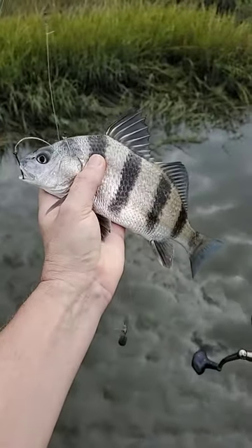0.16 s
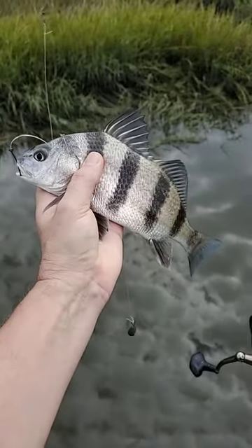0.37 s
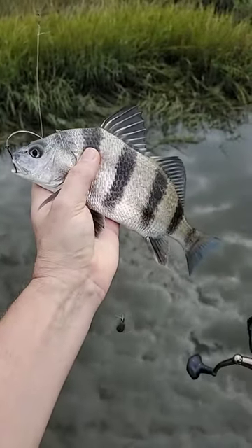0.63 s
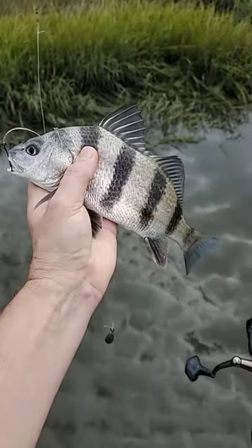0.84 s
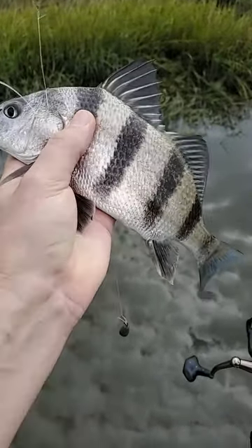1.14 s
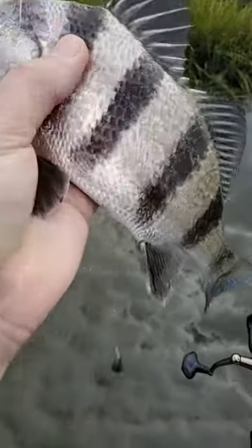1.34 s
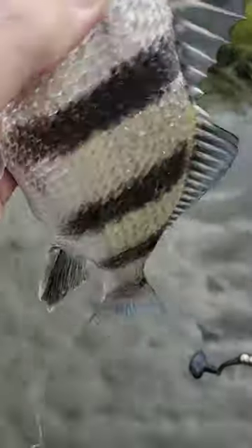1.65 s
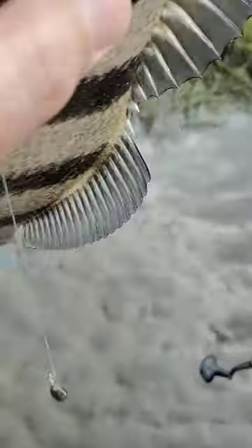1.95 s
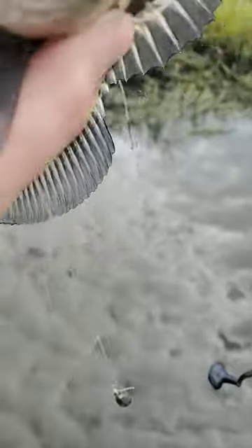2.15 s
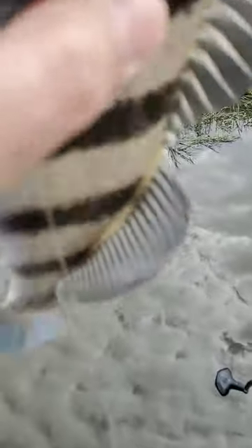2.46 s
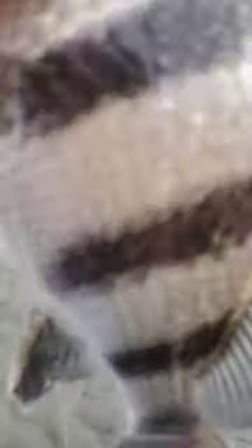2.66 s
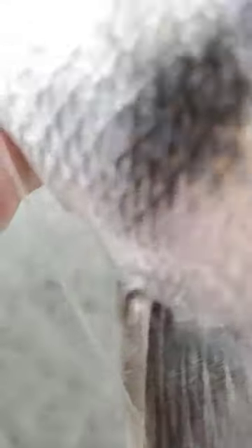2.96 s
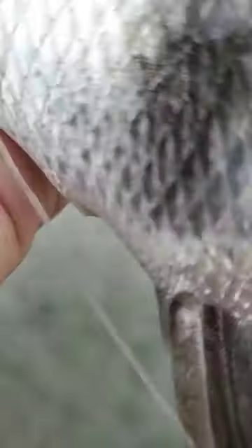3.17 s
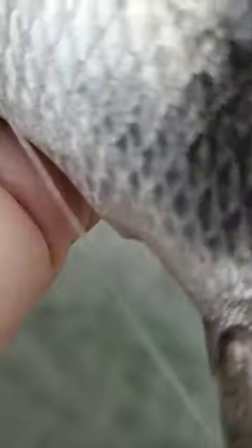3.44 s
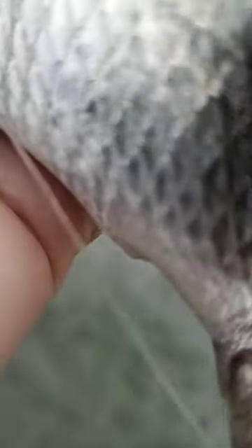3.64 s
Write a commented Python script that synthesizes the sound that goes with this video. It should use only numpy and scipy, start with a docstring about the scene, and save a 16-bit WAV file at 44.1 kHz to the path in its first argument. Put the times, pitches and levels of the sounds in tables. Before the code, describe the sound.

Four rapid hollow thuds from a held drum fish, amid low wind buffeting and quiet marsh air

```python
"""A small drum fish, held in the hand over marshy shallows, drums four times right by the microphone:
each muscle twitch snaps its swim bladder once, a band-limited pulse, and shakes the body, a damped mode.
Wind, as shaped noise and single bumps of air, rumbles and buffets the microphone's two ports.
Shaped noise is also the marsh air with a distant engine's drone, and, throbbing, an insect in the grass.
Ticks and rubbing are faint noise bands, a low hum swells near the end, and sines make a far whistled call."""
import sys
import numpy as np
from scipy import signal
from scipy.fft import rfft, irfft
from scipy.io import wavfile

SR = 44100
rng = np.random.default_rng(int(sys.argv[2]) if len(sys.argv) > 2 else 0)


def log_audio(samples):
    """Write samples as a 16-bit WAV file to the path given in sys.argv[1]."""
    # one column per channel
    frames = np.atleast_2d(samples).T
    # limit to full scale, then quantise
    limited = np.clip(frames, -1, 1)
    pcm = np.round(limited * 32767).astype(np.int16)
    wavfile.write(sys.argv[1], SR, pcm)


N = 167580
T = np.arange(N) / SR
HZ = np.maximum(np.fft.rfftfreq(N, 1 / SR), 1)  # the floor of 1 Hz keeps logs and ratios finite

# In every noise colour, levels are relative. A width is the offset at which a resonance's gain is 1/4.
# Every pan is the left level minus the right, in dB.

# Wind strength. Each row: time in seconds, level in dB.
WIND_LEVEL = [(0, -61), (.14, -49), (.4, -54), (.62, -51), (.78, -46), (.92, -51.5), (1.15, -53.5),
              (1.35, -40.5), (1.6, -50.5), (1.85, -42), (2.1, -44), (2.3, -52), (2.38, -55), (2.55, -49),
              (2.72, -52.5), (2.9, -42), (3.25, -43.5), (3.45, -49.5), (3.8, -37.5)]
# Wind spectrum. Each row: frequency in Hz, relative level in dB per Hz.
WIND_COLOUR = [(15, -40), (30, -9), (41, 18), (62, 12.5), (85, -3), (130, -6), (200, -15), (500, -48.5),
               (3000, -100)]
WIND_FLUTTER_DB, WIND_FLUTTER_HZ, WIND_LIKENESS = 5.5, 7.2, .15
# Low bumps of air on the ports. Each row: centre in seconds, level in dB, pitch in Hz,
# left minus right in dB.
BUFFETS = [(.135, -35, 81, 0), (.764, -34.5, 45.4, 1), (1.34, -32, 70, 10), (2.102, -32.5, 61, -5),
           (2.125, -33, 59, 1), (3.035, -34.5, 52.7, 24.5), (3.252, -28, 64, -14), (3.267, -35, 98.3, 20),
           (3.297, -35, 64, 26), (3.373, -28.5, 68, 13), (3.472, -34, 61.6, -9.5), (3.494, -39, 63.6, -4),
           (3.748, -34, 60.5, -20)]

# Open air of the marsh with a distant engine's low drone near 90 Hz. Each row: frequency in Hz,
# relative level in dB per Hz.
AIR_COLOUR = [(31, -7.5), (61, 11), (79, 12.5), (90, 18), (105, 12), (119, 7), (142, 4), (232, 2),
              (276, -2), (314, 2), (362, -3.5), (482, -9.5), (652, -12), (852, -15.5), (1440, -19.5),
              (1810, -26), (2280, -30), (2820, -36.5), (4520, -38.5), (6320, -39), (7550, -50.5),
              (10100, -47.5), (13100, -42), (15450, -42), (16150, -51)]
# Strength of the air and drone. Each row: time in seconds, level in dB.
AIR_LEVEL = [(0, -43.5), (1.15, -42.5), (2.02, -44), (2.62, -44), (3.22, -42), (3.8, -43)]
# Stereo balance of the air and drone. Each row: frequency in Hz, left minus right in dB.
AIR_BALANCE = [(105, 0.8), (560, -0.3), (960, -1.3), (1720, -7), (2950, 6.5), (5100, 6.5), (8000, -1),
               (15100, 1)]
# Stereo coherence of the air and drone. Each row: frequency in Hz, left-right likeness (1 is identical).
AIR_LIKENESS = [(90, 1), (240, 1), (480, 0.77), (950, 0.14), (1900, 0.0056)]
# Air on the left, growing as the fish comes close. Each row: time in seconds, level in dB.
NEAR_AIR_LEVEL = [(0, -62), (1.5, -65), (2.1, -58.5), (2.6, -60.5), (3.3, -55.5), (3.8, -56)]
# Spectrum of that near air. Each row: frequency in Hz, relative level in dB per Hz.
NEAR_AIR_COLOUR = [(300, -36), (600, 2), (900, 3.5), (1400, -6), (1900, -65), (3300, -23), (5000, -103.5),
                   (8000, -84)]

# Low hum, swelling near the end. Each row: time in seconds, level in dB.
HUM_LEVEL = [(3.2, -59.5), (3.42, -36.5), (3.6, -35.5), (3.8, -35)]
HUM_HZ, HUM_WIDTH_HZ, HUM_LIKENESS = 61.62, 0.28, -0.13

# Strength of the insect's rasp before the wing strokes shape it. Each row: time in seconds, level in dB.
INSECT_LEVEL = [(0, -98), (.44, -80), (.555, -72), (.695, -62.5), (.795, -63), (.875, -79), (.98, -82),
                (1.16, -73), (1.28, -82), (1.47, -72.5), (1.68, -75), (1.87, -78), (2.04, -98)]
# Spectrum of the rasp. Each row: frequency in Hz, relative level in dB per Hz.
INSECT_COLOUR = [(6000, -66), (10400, -22.5), (12400, -10), (14400, -2), (15450, 0.5), (16100, -32)]
# A narrower, lower band of the rasp, before the strokes. Each row: time in seconds, level in dB.
INSECT_RING_LEVEL = [(1.3, -100), (1.5, -83), (1.67, -76), (1.85, -87), (2.0, -105)]
INSECT_RING_HZ, INSECT_RING_WIDTH_HZ, INSECT_PAN_DB = 12900, 700, 4
STROKE_AT_S, STROKE_EVERY_S = .709, .03685
STROKE_HALF_DEPTH_DB, STROKE_UNEVEN_DB = 4.5, .7

# Gusts reaching above the deep rumble. Each row: centre in seconds, level in dB, half-length in seconds.
GUSTS = [(1.055, -57.5, 0.034), (1.207, -47.5, 0.021), (1.52, -61, 0.047), (3.296, -48.5, 0.012)]
GUST_HZ, GUST_WIDTH_HZ, GUST_LIKENESS = 240, 180, 0.96

# Fingers on the scales. Each row: time in seconds, level in dB before panning.
RUB_LEVEL = [(2.0, -104), (2.33, -87), (2.5, -99), (2.72, -90.5), (2.85, -81), (3.0, -97), (3.1, -81),
             (3.3, -84.5), (3.5, -100), (3.8, -89)]
# Spectrum of the rub. Each row: frequency in Hz, relative level in dB per Hz.
RUB_COLOUR = [(1900, -22), (3250, 11), (4550, 4.5), (5450, -19), (6550, -6), (8100, -17), (14900, -23),
              (16100, -32.5)]
RUB_PAN_DB = 6.5

# Dry ticks of handling. Each row: start in seconds, level in dB before decay and panning, centre in Hz.
TICKS = [(2.131, -68.5, 5000), (2.267, -70, 3700), (2.300, -70.5, 3900), (2.329, -72, 4100),
         (2.650, -77, 5600), (2.762, -73, 3900), (2.793, -69.5, 4300), (2.828, -70.5, 4400),
         (2.861, -69, 3900), (2.894, -68.5, 3600), (2.952, -74, 3800), (3.045, -75, 6000),
         (3.063, -68, 3100), (3.099, -69, 3400), (3.757, -73, 6500)]
TICK_WIDTH_HZ, TICK_T60_S, TICK_PAN_DB = 2900, .035, 9.5

# Twitches of the drumming muscle. Each row: time in seconds, thump level in dB, upper edge of the thump
# in Hz, sharp edge in dB relative to the thump, upper limit of the sharp edge in Hz, shaded port in dB
# relative to the open one, body swing level in dB, swing pitch in Hz, swing outward 1 or inward -1.
TWITCHES = [(3.0795, -6.5, 707, -27.5, 1930, -16.5, -18, 64, -1),
            (3.1105, -7.5, 628, -31.5, 1610, -15.5, -37, 66, -1),
            (3.1413, -7, 650, -29.5, 1530, -16, -18, 71.3, -1),
            (3.1803, -5, 653, -30, 1620, -12.5, -14, 61.6, 1)]
THUMP_LOW_HZ, THUMP_STEEPNESS = 234, 6.14
SNAP_LOW_HZ, SNAP_STEEPNESS = 1050, 10
SWING_T60_S, FLESH_CUT_HZ = .1, 2150
FAR_PORT_LAG_S, FAR_EDGE_HZ, FAR_SNAP_DB = 0.00071, 484, -11  # the right port is shaded
FAR_RING_HZ, FAR_RING_DB, FAR_RING_T60_S, FAR_RING_LAG_S = 423, -16.5, .011, .0013

# Far whistled notes. Each row: centre in seconds, half-length in seconds, pitch in Hz,
# level in dB before panning.
WHISTLES = [(3.25, .035, 3720, -84), (3.318, .043, 3110, -77.5), (3.385, .026, 3110, -81)]
WHISTLE_WANDER_HZ, WHISTLE_PAN_DB = 35, 8.5

BASS_CUT_HZ, TREBLE_CUT_HZ = 22, 15600


def from_db(db):
    """Amplitude gain grows tenfold for every 20 dB."""
    return 10 ** (np.asarray(db) / 20)


def rms_one(x):
    """Dividing by the root mean square brings a signal to unit rms."""
    return x / np.sqrt(np.mean(x ** 2) + 1e-20)


def level(rows):
    """A gain envelope follows straight lines in decibels between (s, dB) rows."""
    return from_db(np.interp(T, *np.transpose(rows)))


def over_hz(rows):
    """A spectral curve is interpolated along logarithmic frequency."""
    hz, value = np.transpose(rows)
    return np.interp(np.log(HZ), np.log(hz), value)


def pan(db):
    """A level difference between the ears is split equally into left and right gains."""
    return from_db(np.array([[1], [-1]]) * db / 2)


def noise(gain, likeness=0):
    """Stereo coherence follows the balance of independent mid and side noise; spectrally shaped, rms 1."""
    mid, side = rfft(rng.standard_normal((2, N)))
    c = np.clip(likeness, -1, 1)
    stereo = np.sqrt(1 + c) * mid + np.sqrt(1 - c) * side * [[1], [-1]]
    return rms_one(irfft(gain * stereo, N))


def narrow(hz, width_hz):
    """A resonance passes most at its centre and falls away on both sides."""
    return 1 / (1 + ((HZ - hz) / width_hz) ** 2) ** 2


def drift(rate_hz):
    """Low-passed noise wanders slowly; rms 1."""
    return rms_one(irfft(rfft(rng.standard_normal(N)) / (1 + (HZ / rate_hz) ** 4), N))


def push(s, low_hz, high_hz, steepness):
    """A brief in-and-out surface movement gives a band-limited pulse: peak between troughs, height 1."""
    low_side = 1 + (low_hz / HZ) ** 4
    high_side = 1 + (HZ / high_hz) ** (2 * steepness)
    band = 1 / np.sqrt(low_side * high_side)
    centred_at_s = np.exp(-2j * np.pi * HZ * s)
    return irfft(band * centred_at_s, N) / band.mean()


def decay(s, t60):
    """Damping is exponential: from its start at s the level falls 60 dB in each t60."""
    return (T >= s) * from_db(-60 * np.clip((T - s) / t60, 0, 10))


def ring(s, hz, t60):
    """A struck damped mode is a sine that decays exponentially from s."""
    return np.sin(2 * np.pi * hz * (T - s)) * decay(s, t60)


def wind():
    """Turbulence is low noise of fluctuating level; each buffet is one short bell-shaped pressure swing."""
    flutter = from_db(WIND_FLUTTER_DB * drift(WIND_FLUTTER_HZ))
    out = level(WIND_LEVEL) * flutter * noise(from_db(over_hz(WIND_COLOUR)), WIND_LIKENESS)
    for s, db, hz, pan_db in BUFFETS:
        cycles = hz * (T - s)
        bell = np.exp(-np.minimum(2 * cycles ** 2, 20))
        out += pan(pan_db) * from_db(db) * -np.sin(2 * np.pi * cycles) * bell
    return out


def marsh_air_and_engine():
    """Marsh air and distant engine drone are shaped noise, coherent in the bass; near air adds to the left."""
    far = noise(from_db(over_hz(AIR_COLOUR)) * pan(over_hz(AIR_BALANCE)), over_hz(AIR_LIKENESS))
    near = noise(from_db(over_hz(NEAR_AIR_COLOUR))) * [[1], [0]]
    return level(AIR_LEVEL) * far + level(NEAR_AIR_LEVEL) * near


def hum():
    """Noise through a very narrow resonance becomes a wavering tone, faint until it swells."""
    return level(HUM_LEVEL) * noise(narrow(HUM_HZ, HUM_WIDTH_HZ), HUM_LIKENESS)


def insect():
    """Amplitude modulation makes a very high noise rasp throb at each slightly uneven wing stroke."""
    stroke_phase = 2 * np.pi * (T - STROKE_AT_S) / STROKE_EVERY_S
    throb_db = STROKE_HALF_DEPTH_DB * (np.cos(stroke_phase) - 1)
    strokes = from_db(throb_db + STROKE_UNEVEN_DB * drift(15))
    rasp = level(INSECT_LEVEL) * noise(from_db(over_hz(INSECT_COLOUR)))
    ringing = level(INSECT_RING_LEVEL) * noise(narrow(INSECT_RING_HZ, INSECT_RING_WIDTH_HZ))
    return pan(INSECT_PAN_DB) * strokes * (rasp + ringing)


def gusts():
    """Brief surges of turbulence are low-middle noise bands, nearly coherent between the ports."""
    swell = sum(from_db(db) / (1 + ((T - s) / half_s) ** 4) for s, db, half_s in GUSTS)
    return swell * noise(narrow(GUST_HZ, GUST_WIDTH_HZ), GUST_LIKENESS)


def fingers():
    """Friction of fingers on the scales is treble noise with a slowly varying level."""
    return pan(RUB_PAN_DB) * level(RUB_LEVEL) * noise(from_db(over_hz(RUB_COLOUR)))


def ticks():
    """A dry impact is a decaying burst of broad-band noise whose centre frequency sets its brightness."""
    out = 0
    for s, db, hz in TICKS:
        burst = decay(s, TICK_T60_S) * noise(narrow(hz, TICK_WIDTH_HZ))
        out = out + from_db(db) * burst
    return pan(TICK_PAN_DB) * out


def fish():
    """A twitch radiates one bladder pulse and a damped body swing; shading delays and dulls the pulse."""
    out = np.zeros((2, N))
    for s, db, edge_hz, snap_db, snap_hz, far_db, swing_db, swing_hz, direction in TWITCHES:
        thump = push(s, THUMP_LOW_HZ, edge_hz, THUMP_STEEPNESS)
        snap = from_db(snap_db) * push(s, SNAP_LOW_HZ, snap_hz, SNAP_STEEPNESS)
        swing = np.sign(direction) * from_db(swing_db) * ring(s, swing_hz, SWING_T60_S)
        out[0] += from_db(db) * (thump + snap) + swing
        # the shaded right port also rings briefly
        dull = from_db(far_db) * push(s + FAR_PORT_LAG_S, THUMP_LOW_HZ, FAR_EDGE_HZ, THUMP_STEEPNESS)
        late_snap = from_db(FAR_SNAP_DB) * np.interp(T - FAR_PORT_LAG_S, T, snap)
        ringing = -from_db(FAR_RING_DB) * ring(s + FAR_RING_LAG_S, FAR_RING_HZ, FAR_RING_T60_S)
        out[1] += from_db(db) * (dull + late_snap + ringing) + from_db(far_db) * swing
    flesh = 1 / (1 + (HZ / FLESH_CUT_HZ) ** 20)
    return irfft(rfft(out) * flesh, N)


def far_bird():
    """A whistle is nearly a pure tone: sines of slightly wavering frequency, one high note then two lower."""
    out = 0
    for s, half_s, hz, db in WHISTLES:
        swell = 1 / (1 + ((T - s) / half_s) ** 6)
        pitch = hz + WHISTLE_WANDER_HZ * drift(60)
        tone = rms_one(np.sin(2 * np.pi * np.cumsum(pitch) / SR))
        out = out + from_db(db) * swell * tone
    return pan(WHISTLE_PAN_DB) * out


def scene():
    """Sound pressures superpose: the fish in front, the marsh and a distant engine behind."""
    background = wind() + marsh_air_and_engine() + hum() + insect() + gusts() + far_bird()
    return background + fingers() + ticks() + fish()


def record(dry):
    """Limited bandwidth rolls off the deepest bass and cuts the top steeply with an elliptic low-pass."""
    lean = irfft(rfft(dry) / np.sqrt(1 + (BASS_CUT_HZ / HZ) ** 10), N)
    top_cut = signal.ellip(12, .1, 80, TREBLE_CUT_HZ, fs=SR, output="sos")
    return signal.sosfilt(top_cut, lean)


dry = scene()
out = record(dry)
log_audio(out)
```